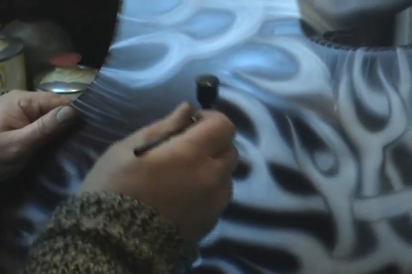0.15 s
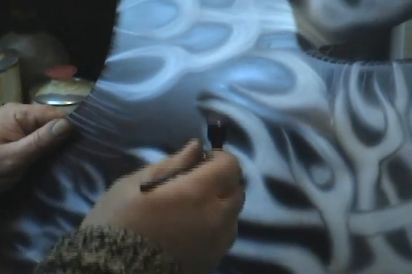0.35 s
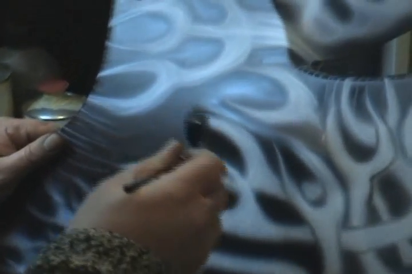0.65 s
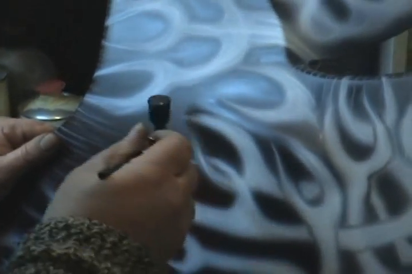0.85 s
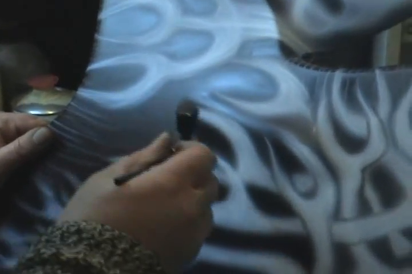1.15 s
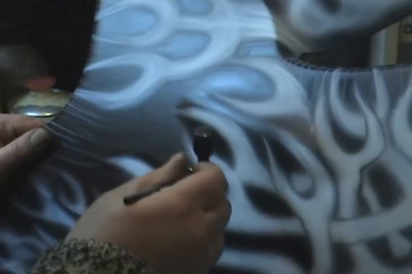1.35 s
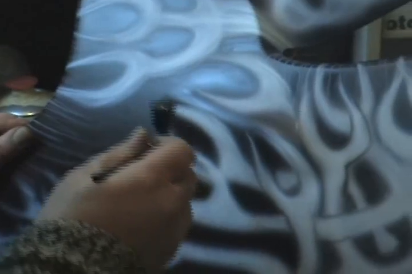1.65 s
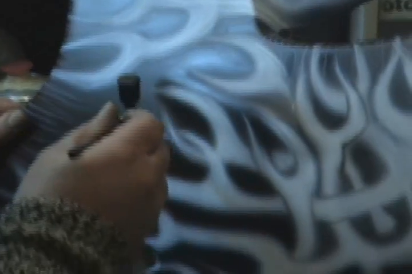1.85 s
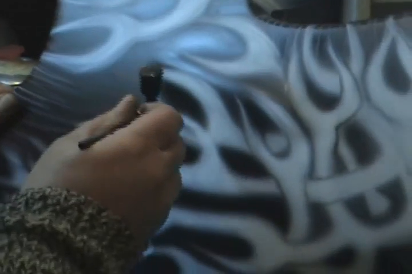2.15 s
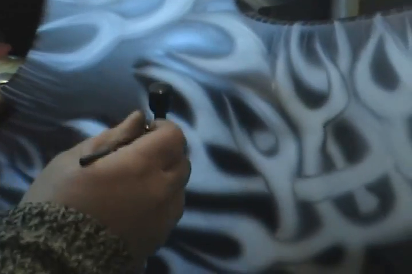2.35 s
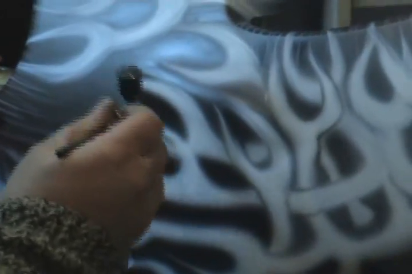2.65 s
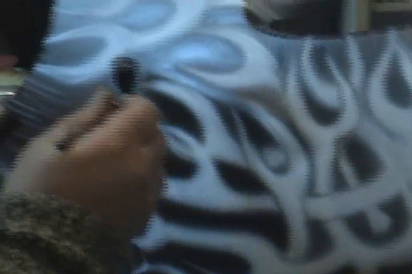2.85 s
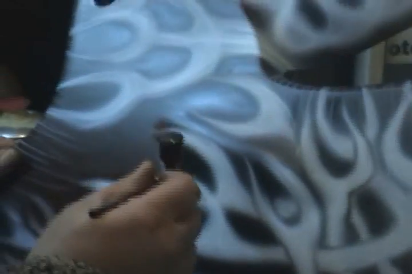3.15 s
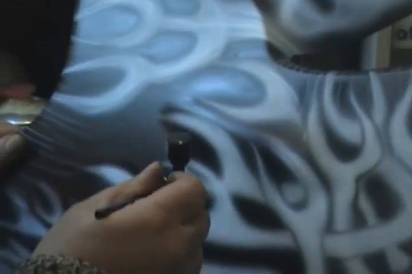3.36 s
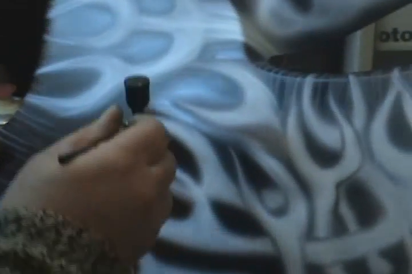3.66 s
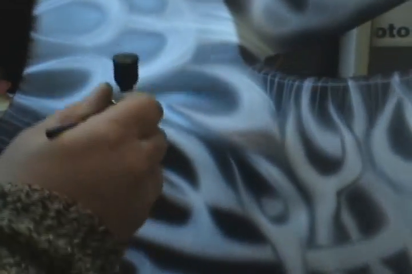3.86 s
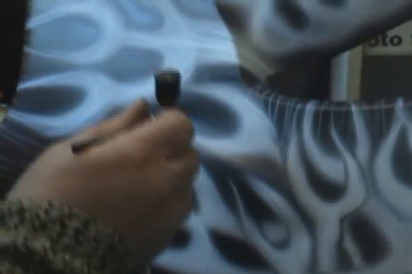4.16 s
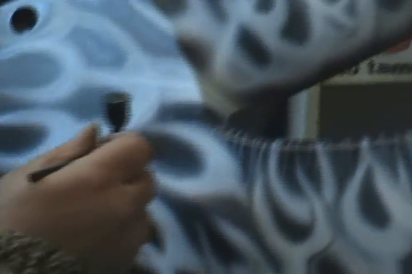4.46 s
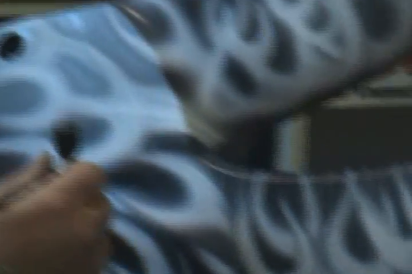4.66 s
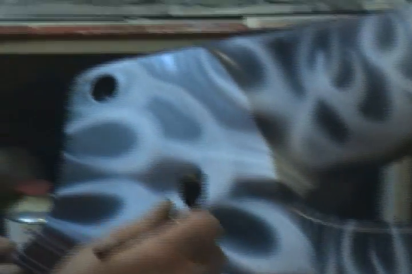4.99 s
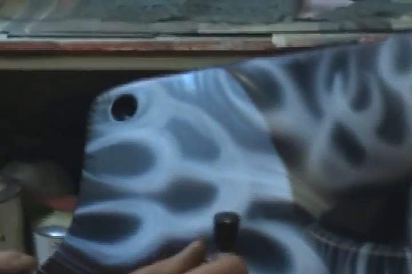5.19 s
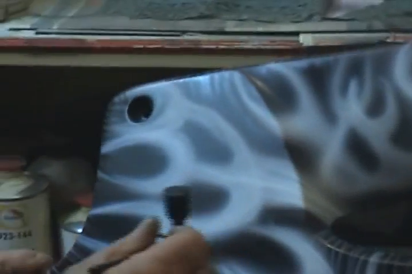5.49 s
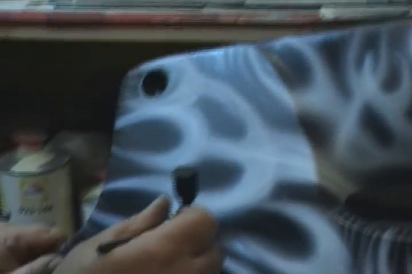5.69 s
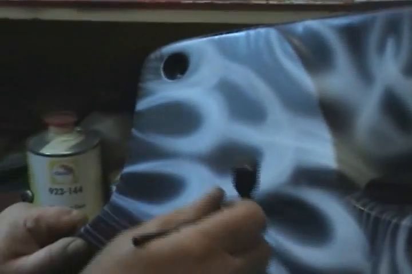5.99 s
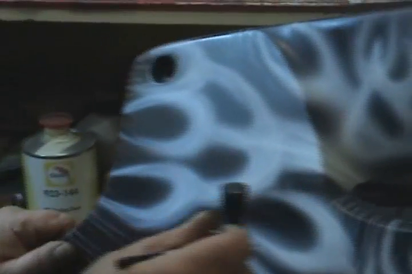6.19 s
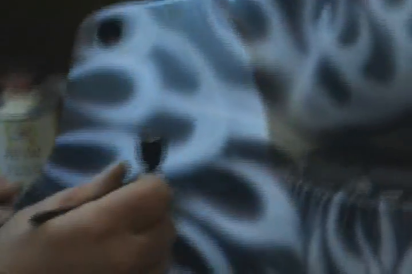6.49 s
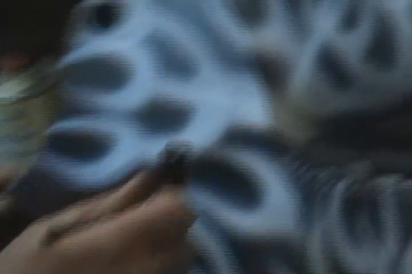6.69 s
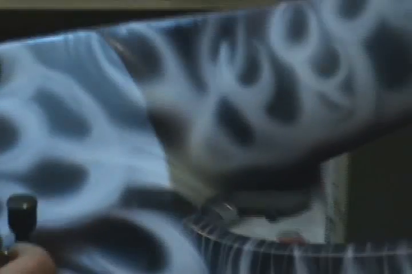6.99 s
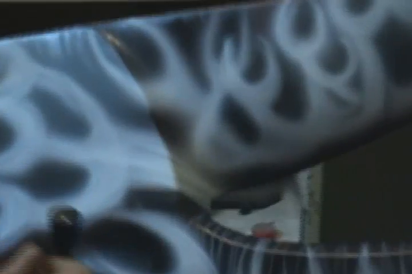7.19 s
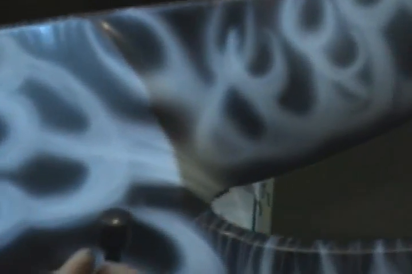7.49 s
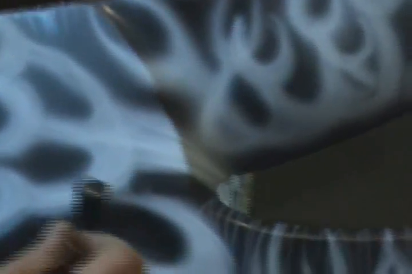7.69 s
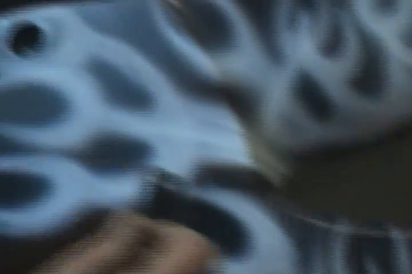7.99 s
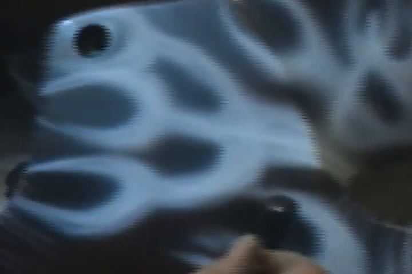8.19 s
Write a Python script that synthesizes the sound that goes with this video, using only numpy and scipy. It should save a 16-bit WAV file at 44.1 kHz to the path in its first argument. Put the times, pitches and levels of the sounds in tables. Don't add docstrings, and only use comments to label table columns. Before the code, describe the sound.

Regular spurts of sharp, airy paint spray start abruptly and close with a quick soft fall, leaving a short room tail. Between them an extractor fan rushes low and dull, its motor surging slowly, with a thin camera whine until about two thirds through. One rap comes early, a small rattle later, then many hollow knocks on the camera body during the last sprays.

```python
import sys
import numpy as np
from scipy import signal
from scipy.io import wavfile
from scipy.ndimage import uniform_filter1d, map_coordinates

SR = 44100
rng = np.random.default_rng(int(sys.argv[2]) if len(sys.argv) > 2 else 0)


def voltage_ratio(level):
    return 10 ** (np.asarray(level, float) / 20)


def dump_mix(stems):
    frames = np.atleast_2d(stems).T
    limited = np.clip(frames, -1, 1)
    pcm = np.round(limited * 32767).astype(np.int16)
    wavfile.write(sys.argv[1], SR, pcm)


N = 367785

# (frequency [Hz], density [dB])
FAN_COLOUR = [(15, -13), (40, -11), (65, -13.5), (95, -6), (200, -1), (320, -1), (442, -3.5), (751, -6),
              (1050, -4.5), (1900, -10), (2420, -15), (3290, -18.5), (8260, -23.5), (15700, -30)]
# (frequency [Hz], width [Hz], level over the rush [dB])
DUCT_RESONANCES = [(50.7, 10, 1), (76.4, 7.4, 11.5), (114.8, 19.7, 8.5), (146.7, 8, 7), (257, 21, 6),
                   (261, 21, -0.5), (293.6, 18.5, 5.5), (216, 11, -1.5), (380, 27, -2)]
# (time [s], level [dB])
FAN_LEVEL = [(0, -35), (2.9, -32), (4.7, -33.5), (6.2, -32), (7.2, -30.5), (8.34, -31.5)]
# (frequency [Hz], likeness [0-1], left over right [dB], right leads [rad])
FAN_STEREO = [(25, 0.9, -1, 1.1), (50, 0.63, 0.5, 1.4), (115, 0.75, -7, 0.73), (260, 0.81, -7.5, 0.26),
              (398, 0.9, -8.5, 0.88), (503, 0.15, -8, 0.36), (704, 0.63, -11, 0.052),
              (960, 0.76, -10, -0.96), (1500, 0.68, -7, -0.92), (2400, 0.47, -2.5, -0.4),
              (6000, 0.57, -2, -0.5), (15000, 0.2, -9, 0)]
# (frequency [Hz], usual level [dB], slow waver [dB])
MOTOR_TONES = [(26, -43.5, 0), (53.2, -49, 6), (196.4, -48.5, 1.5)]
# (middle [s], width [s], level over usual [dB])
MOTOR_SURGES = [
    [(1.34, .4, 5), (2.67, .2, 0), (3.34, 0.18, 7), (5.64, .3, 1), (7.8, 0.24, 6)],
    [(2.25, .5, 8.5), (3.4, .4, 6), (4.55, 0.25, 12.5), (5.3, .3, 3)],
    [(2.97, .2, 12.5), (3.6, .2, 7), (4.23, 0.28, 4), (5.35, 0.3, 7.5), (7.27, 0.23, 14)],
]

# (frequency [Hz], width [Hz], level [dB], stop [s])
WHINE_LINES = [(8140, 220, -54.5, 5.7), (14280, 110, -54, 5.6), (13950, 300, -61, 5),
               (13600, 400, -48, 5.65), (11000, 350, -60, 6.28)]
WHINE_STARTS = [0, 0, 0, 5.595, 6.15]
# (time [s], frequency [Hz], level [dB])
BODY_HUM = [(0, 524.3, -47), (3, 520.6, -48.5), (3.5, 519, -54.5), (5.8, 517, -45), (6.3, 516.6, -41),
            (7.15, 544, -46), (7.201, 633, -44.5), (8.34, 636, -47)]
# (time [s], peak level [dB], frequency [Hz])
FAINT_KNOCKS = [(2.887, -24, 513), (4.777, -30, 557), (5.966, -24, 520), (6.255, -21.5, 490),
                (6.354, -25, 560), (6.449, -32, 550), (6.505, -29, 546), (6.693, -30, 500),
                (6.749, -30, 541), (6.811, -26, 533), (6.89, -27, 533), (7.014, -24, 537),
                (7.086, -26, 501), (7.204, -26, 624), (7.382, -33, 614), (7.454, -22, 655),
                (7.524, -24, 635), (7.59, -29, 620)]
# (time [s], peak level [dB], frequency [Hz], rise [s], length [s])
CLEAR_RAPS = [
    (1.4535, -25.5, 530, .0018, .021),
    (7.806, -21.5, 640, .0081, .022),
    (8.056, -18, 640, .014, .027),
    (8.102, -15, 625, .0016, .029),
    (8.161, -21, 630, .003, .027),
    (8.206, -19.5, 640, .004, .015),
    (8.2185, -20.5, 615, .004, .015),
    (8.264, -19, 625, .003, .014),
    (8.278, -21, 620, .004, .015),
    (8.333, -20, 635, .004, .02),
]
# (frequency [Hz], level [dB], decay t60 [s])
RAP_IN_AIR = [(980, -17, .025), (525, -31, .16)]
# (time [s], peak level [dB])
GRIP_TICKS = [
    (3.23, -23),
    (6.136, -31),
    (6.161, -23),
    (6.185, -24),
    (6.2035, -21.5),
    (6.2145, -29),
    (6.239, -28),
]

# (frequency [Hz], t60 [s])
ROOM_DECAY = [(1000, 0.36), (3000, 0.22), (6000, 0.21), (10000, 0.16), (15000, 0.15)]
# (frequency [Hz], likeness [0-1])
ROOM_LIKENESS = [(1000, 0.56), (4500, 0.63), (8000, 0.74), (15000, .3)]

# (opens [s], let go [s], air flow at start [dB], at middle [dB], at end of stroke [dB])
PRESSES = [(-.05, 0.235, -13.5, -13.5, -13), (0.431, 0.679, -11, -12, -13.5),
           (0.894, 1.202, -15, -13, -12.5), (1.449, 1.725, -12, -11.5, -14),
           (1.919, 2.201, -14, -12, -12.5), (2.403, 2.647, -10, -11.5, -13.5),
           (2.854, 3.139, -14.5, -13, -11), (3.33, 3.489, -9.5, -10.5, -14), (3.803, 4.072, -17, -14, -13),
           (4.247, 4.522, -14.5, -10.5, -12.5), (4.731, 4.989, -13, -8.5, -9),
           (5.185, 5.454, -7.5, -7, -10), (5.66, 6.035, -12, -8, -8.5), (6.281, 6.772, -11, -7.5, -9),
           (6.981, 7.32, -12.5, -7.5, -9), (7.455, 7.721, -8, -9, -11), (7.865, 8.34, -10.5, -8.5, -11.5)]
# (valve closing time [s], panel splash [dB], nozzle edge [dB], edge change over the stroke [dB])
AIMS = [(0.026, -13.5, -8.5, 1), (0.058, -13.5, -4.5, -4.5), (0.033, -13.5, -8.5, 2),
        (0.053, -13.5, -3.5, -6), (.021, -14, -4.5, -3.5), (0.051, -14, -3.5, -6), (0.033, -13, -10, 4.8),
        (0.045, -14, -3, -7), (0.033, -12, -11.5, 0.5), (0.034, -14, -12.5, 4.5), (0.014, -15, -7, 0),
        (0.031, -15.5, -6, -2), (0.013, -16, -8.5, 1), (0.026, -15.5, -8, -1.8), (0.013, -15, -7.5, -2),
        (0.011, -15, -6.5, -4.5), (.03, -14, -8.5, -8)]
# (frequency [Hz], density [dB])
JET_COLOUR = [(410, -76), (700, -25), (817, -17.5), (1110, -20.5), (1560, -15.5), (1710, -19),
              (2270, -13.5), (3010, -13), (3850, -10), (5310, -8), (6530, -3.5), (8340, -2), (10700, -1.5),
              (15300, -7.5)]
# (frequency [Hz], width [Hz], level [dB])
HOUSING = [(2950, 340, -1), (3800, 600, 1.5), (5200, 330, 0.5), (5790, 470, 2.35), (11400, 1100, -0.5),
           (12900, 1100, 1.5), (15300, 1300, -1.5)]
# (time [s], panel ripple [Hz], panel share [0-1], hand ripple [Hz], hand share [0-1])
BOUNCES = [(0, 2480, 0.1, 3800, 0.023), (1.5, 2520, 0.084, 3800, 0.023), (2, 2600, 0.11, 3800, 0.038),
           (2.4, 2450, 0.12, 3800, 0.035), (3.1, 2430, 0.11, 3800, 0.034), (3.4, 2400, .03, 3670, 0.074),
           (3.85, 2500, .02, 3080, 0.036), (4.2, 2500, .02, 3900, 0.078), (4.5, 2120, 0.049, 3800, .04),
           (4.77, 2090, .05, 3700, 0.092), (4.97, 2160, .03, 3150, 0.055), (5.22, 2180, .04, 3790, 0.047),
           (6.3, 2140, 0.049, 3780, 0.094), (6.5, 2160, 0.041, 3800, 0.076), (6.62, 2120, .03, 3060, 0.12),
           (7.02, 2140, .02, 3650, 0.085), (7.5, 1990, 0.035, 3470, 0.13), (7.9, 2440, .11, 3600, 0.05)]
# (frequency [Hz], level [dB])
SCATTER = [(1000, -25), (4000, -10), (7000, -12.5), (10000, -13), (15000, -15)]


def evened(x):
    return x / np.sqrt(np.mean(x ** 2) + 1e-20)


def read(points, hz, column=1):
    table = np.transpose(points)
    return np.interp(np.log(hz + 1), np.log(table[0] + 1), table[column])


def add(mix, s, sound):
    part = mix[round(s * SR):][:len(sound)]
    part += sound[:len(part)]


def smoothed(x, span):
    return uniform_filter1d(uniform_filter1d(x, span), span)


def frames(size):
    hop = size // 4
    return np.fft.rfftfreq(size, 1 / SR)[:, None], np.arange(N // hop + 5) * hop / SR


def patches(hz, t, bins, steps):
    field = rng.standard_normal((len(t), len(hz))).T
    across = uniform_filter1d(field, int(bins), 0)
    return evened(uniform_filter1d(across, int(steps), 1))


def static(hz, t):
    real, imaginary = rng.standard_normal((len(t), len(hz), 2)).T
    return real + 1j * imaginary


def sound_of(z, size):
    return signal.istft(z, nperseg=size, noverlap=size - size // 4)[1][..., :N]


def fuzzy(hz, width):
    flutter = smoothed(rng.standard_normal((2, N)), int(SR / width))
    turn = 2 * np.pi * np.cumsum(hz * np.ones(N)) / SR
    return evened(flutter[0] * np.cos(turn) + flutter[1] * np.sin(turn))


def to_pair(left, other, hz):
    same = np.clip(read(FAN_STEREO, hz), 0, 1)
    lead = np.exp(1j * read(FAN_STEREO, hz, column=3))
    right = (same * left + np.sqrt(1 - same ** 2) * other) * lead
    lean_db = read(FAN_STEREO, hz, column=2)
    return np.array([left * voltage_ratio(lean_db / 2), right * voltage_ratio(-lean_db / 2)])


def fan():
    hz, t = frames(size=4096)
    resonances = 1 + sum(voltage_ratio(2 * db) / (1 + (2 * (hz - f) / width) ** 4) for f, width, db in DUCT_RESONANCES)
    z = to_pair(static(hz, t), static(hz, t), hz)
    z *= np.sqrt(resonances) * voltage_ratio(read(FAN_COLOUR, hz) + 1.2 * patches(hz, t, 5.4, 8))
    level_db = np.interp(np.arange(N) / SR, *np.transpose(FAN_LEVEL)) + 2.0
    return evened(sound_of(z, size=4096)) * voltage_ratio(level_db)


def fan_motor():
    t, out = np.arange(N) / SR, np.zeros((2, N))
    for (hz, db, waver_db), surges in zip(MOTOR_TONES, MOTOR_SURGES):
        drift, waver = (evened(smoothed(noise, 3500)) for noise in rng.standard_normal((2, N)))
        surge_db = sum(over_db * np.exp(-((t - s) / width) ** 2) for s, width, over_db in surges)
        level_db = db + 3.5 + surge_db + waver_db * waver
        tone = np.exp(2j * np.pi * np.cumsum(hz + 2.2 * drift) / SR) * voltage_ratio(level_db)
        out += to_pair(tone, 0, hz).real
    return out


def camera_whine():
    out = np.zeros((2, N))
    for start, (hz, width, db, stop) in zip(WHINE_STARTS, WHINE_LINES):
        line = np.array([fuzzy(hz, width), fuzzy(hz, width)])
        running = np.interp(np.arange(N) / SR, [start - .01, start, stop, stop + .01], [0, 1, 1, 0])
        out += voltage_ratio(db) * evened(line + .5 * line[::-1]) * running
    return out


def body_knocks():
    s, hz, db = np.transpose(BODY_HUM)
    t = np.arange(N) / SR
    out = fuzzy(np.interp(t, s, hz), 74) * voltage_ratio(np.interp(t, s, db))
    # rise s, length s, decay t60 s
    faint = [(*row, 0.0046, 0.018, 0.11) for row in FAINT_KNOCKS]
    clear = [(*row, .3) for row in CLEAR_RAPS]
    for s, db, hz, rise, length, t60 in faint + clear:
        t = np.arange(0, length, 1 / SR)
        sharp = rise < .0025
        blow = 1 + np.exp(-t / .002) * sharp
        glide = (.15 + .3 * sharp) * np.exp(-t / .003)
        ring = np.sin(2 * np.pi * (hz * t - glide)) * voltage_ratio(db - 60 * t / t60) * blow
        damping = np.minimum((length - t) / 0.011, 1)
        add(out, s, ring * np.minimum(t / rise, 1) * damping)
    return out * np.array([[-.6], [2.4]])


def rap_in_air():
    out, t = np.zeros(N), np.arange(1500) / SR
    ring = sum(voltage_ratio(db - 60 * t / t60) * np.sin(2 * np.pi * hz * t) for hz, db, t60 in RAP_IN_AIR)
    fade = np.minimum((t[-1] - t) / .01, 1)
    add(out, CLEAR_RAPS[0][0], ring * np.minimum(t / .001, 1) * fade)
    return out


def swayed(x):
    sway = 30 * np.sin(2 * np.pi * 1.07 * np.arange(N) / SR)
    return map_coordinates(x, [np.arange(N) - 30 - sway], order=3)


def workshop(x):
    taps, slots = np.zeros((3, 2, SR // 3)), np.arange(120, SR // 3 - 10, 10)
    at = slots + rng.integers(0, 10, (3, 2, len(slots)))
    np.put_along_axis(taps, at, rng.choice([-1., 1.], at.shape), 2)
    hz, t, z = signal.stft(taps, SR, nperseg=128)
    same = np.clip(read(ROOM_LIKENESS, hz), 0, 1)[:, None]
    z[:, 1] = same * z[:, 0] + np.sqrt(1 - same ** 2) * z[:, 1]
    decay = voltage_ratio(-60 * t / read(ROOM_DECAY, hz)[:, None])
    tails = signal.istft(z * decay, SR, nperseg=128)[1]
    tails /= np.linalg.norm(tails, axis=2, keepdims=True)
    phase = 3.1 * np.arange(N) / SR + np.arange(3)[:, None] / 3
    turns = np.sqrt(2 / 3) * np.cos(np.pi * phase)
    return signal.fftconvolve((x * turns)[:, None], tails, axes=2).sum(0)[:, :N]


def grip_ticks():
    out, t = np.zeros(N), np.arange(300) / SR
    for (s, db), noise in zip(GRIP_TICKS, rng.standard_normal((len(GRIP_TICKS), len(t)))):
        add(out, s, voltage_ratio(db - 60 * t / .014) * noise)
    return signal.sosfilt(signal.butter(2, [900, 7000], "bandpass", fs=SR, output="sos"), out)


def trigger(t):
    press = np.maximum(np.searchsorted(np.transpose(PRESSES)[0] - .06, t) - 1, 0)
    opens, shuts, first_db, middle_db, last_db, *aim = np.hstack([PRESSES, AIMS])[press].T
    closing_s, splash_db, edge_db, drift_db = aim
    u = np.clip((t - opens) / (shuts - opens), 0, 1)
    stroke_db = first_db * (1 - u) * (1 - 2 * u) + 4 * middle_db * u * (1 - u) + last_db * u * (2 * u - 1)
    opening_db = 1502 * np.minimum(t - opens, 0)
    settle_db = -0.5 * np.exp(-np.maximum(t - opens, 0) / 0.012)
    shut = np.maximum(t - shuts, 0) / closing_s
    closing_db = -23 * shut ** 1.47
    burst = np.exp(-abs(t - opens) / 0.034)
    spent = np.minimum(shut, 1)
    lift_db = -1.5 * (u - .5)
    return (stroke_db + settle_db + opening_db + closing_db,
            splash_db + lift_db - 2 * burst + 3 * spent,
            edge_db + drift_db * u + 1 * burst - 2.5 * spent)


def airbrush():
    hz, t = frames(size=512)
    _, splash_db, edge_db = trigger(t)
    low, high = 1 / (1 + (hz / 5200) ** 6), 1 / (1 + (11000 / (hz + 1)) ** 8)
    colour_db = read(JET_COLOUR, np.minimum(hz, 15250))
    colour_db = colour_db + low * (splash_db + 11.5) + high * (edge_db + 5)
    colour_db = colour_db + sum(db * np.exp(-(2 * (hz - f) / width) ** 2) for f, width, db in HOUSING)
    s, *columns = np.transpose(BOUNCES)
    panel_hz, panel, hand_hz, hand = (np.interp(t, s, c) for c in columns)
    hard = 2.1 / (1 + (5000 / (hz + 1)) ** 4)
    off_panel = panel * np.exp(-2j * np.pi * hz / panel_hz)
    off_hand = hand * np.exp(-2j * np.pi * hz / hand_hz)
    paths = 1 + hard * (off_panel + off_hand)
    shape = paths * voltage_ratio(colour_db + .6 * patches(hz, t, 4.6, 27))
    shape /= np.sqrt((abs(shape) ** 2).mean(0))
    jet_and_scatter = np.array([static(hz, t), voltage_ratio(read(SCATTER, hz)) * static(hz, t)])
    hiss = sound_of(shape * jet_and_scatter, size=512)
    hiss /= hiss[0].std()
    flow = voltage_ratio(trigger(np.arange(N) / SR)[0])
    sputter = evened(uniform_filter1d(rng.standard_normal(N), 250))
    return hiss * flow * voltage_ratio(0.56 * sputter)


def scene():
    jet, scatter = airbrush()
    near = jet + grip_ticks()
    direct = near * voltage_ratio([[-.7], [-.1]]) + scatter * np.array([[1], [-1]])
    room = voltage_ratio(-8) * workshop(swayed(near))
    background = fan() + fan_motor() + camera_whine()
    return direct + room + background + body_knocks() + rap_in_air()


def top_cut(x):
    return signal.sosfilt(signal.butter(12, 15840, fs=SR, output="sos"), x)


def record(dry):
    low_pass = signal.firwin(801, 15740, window=("kaiser", 8), fs=SR)
    band = signal.oaconvolve(dry, low_pass[None], "same")
    ceiling = 0.96
    return top_cut(np.clip(band, -ceiling, ceiling))


dry = scene()
out = record(dry)
dump_mix(out)
```